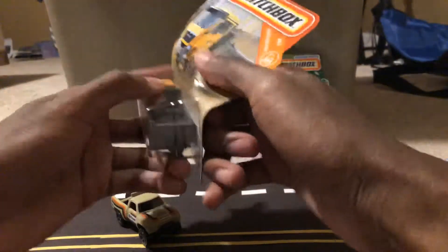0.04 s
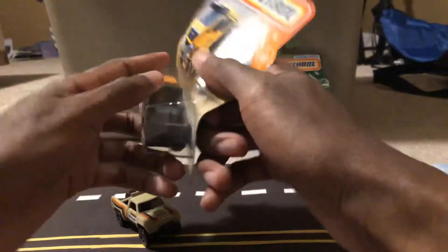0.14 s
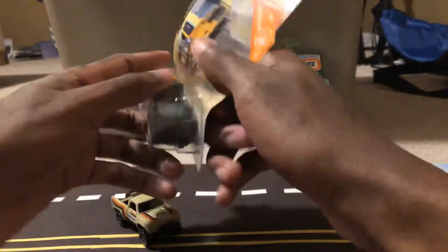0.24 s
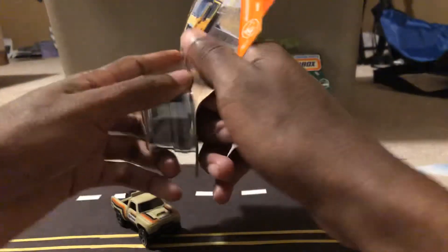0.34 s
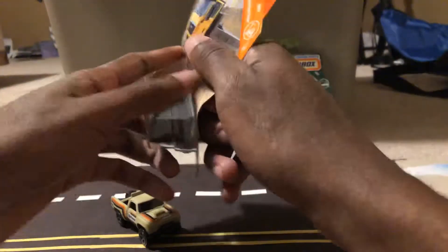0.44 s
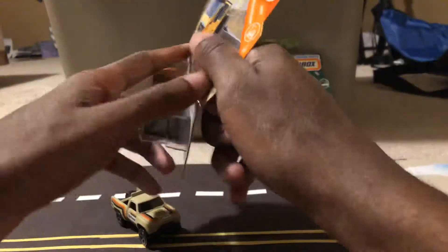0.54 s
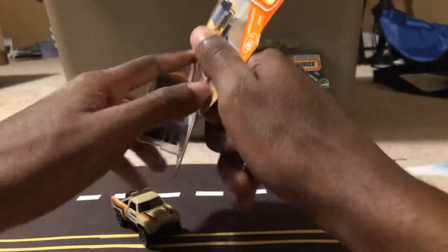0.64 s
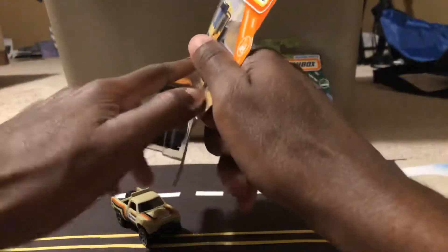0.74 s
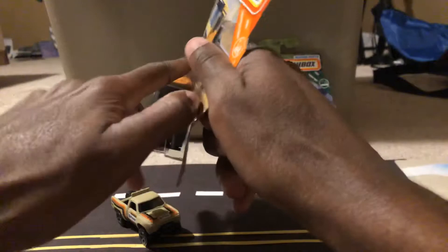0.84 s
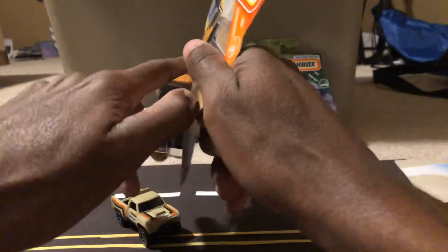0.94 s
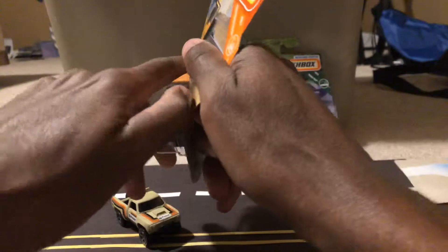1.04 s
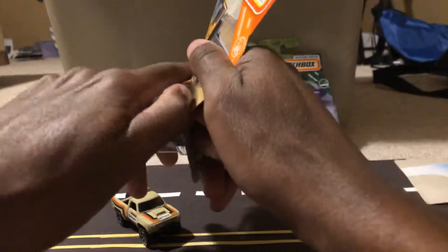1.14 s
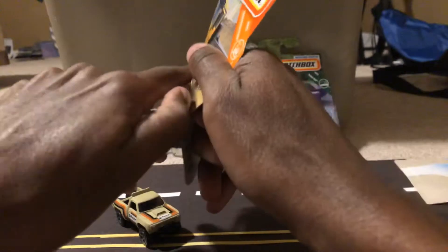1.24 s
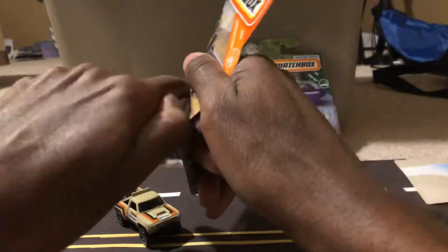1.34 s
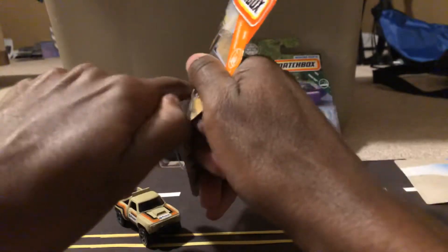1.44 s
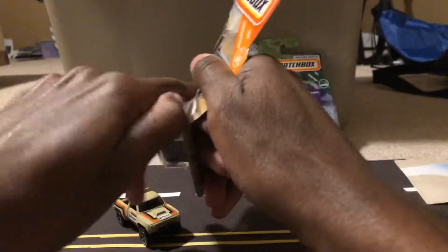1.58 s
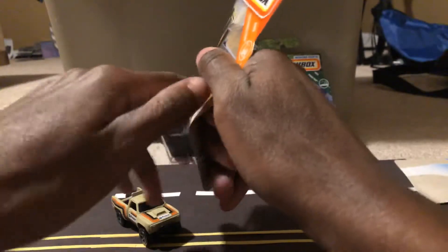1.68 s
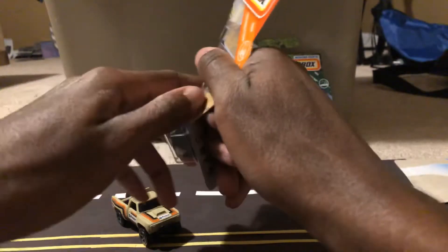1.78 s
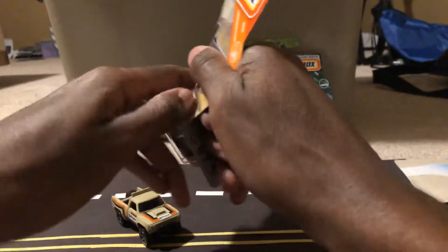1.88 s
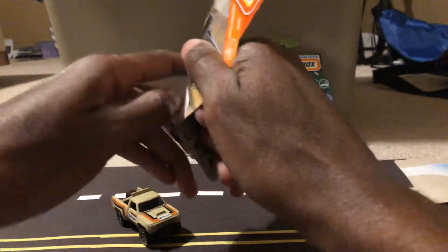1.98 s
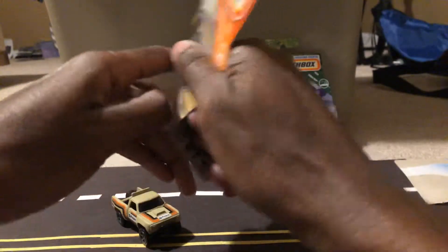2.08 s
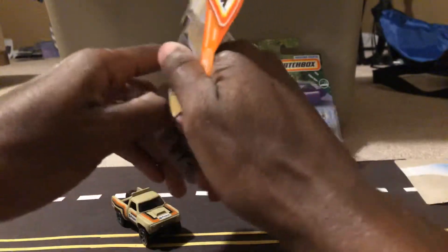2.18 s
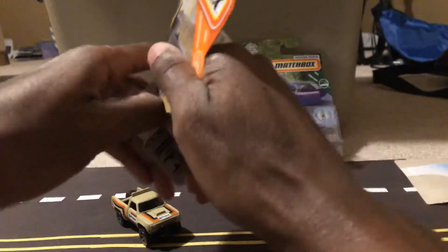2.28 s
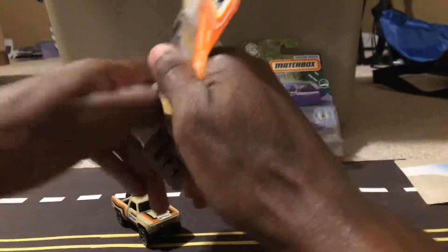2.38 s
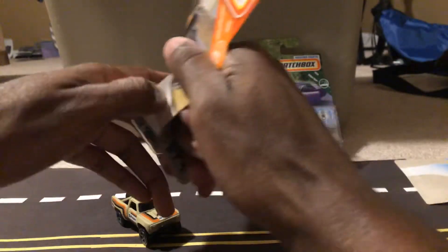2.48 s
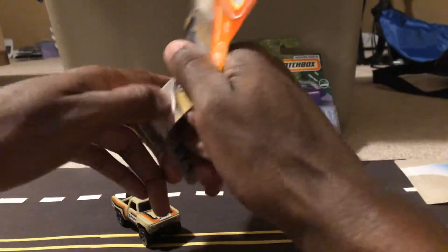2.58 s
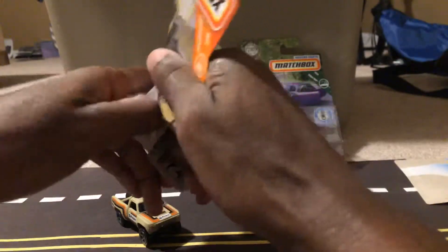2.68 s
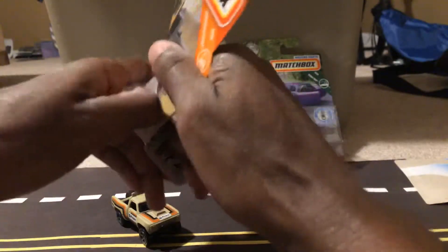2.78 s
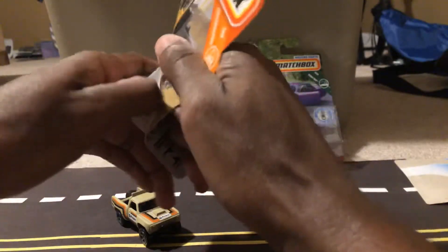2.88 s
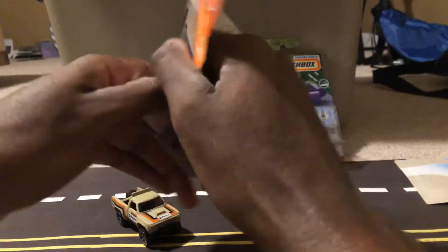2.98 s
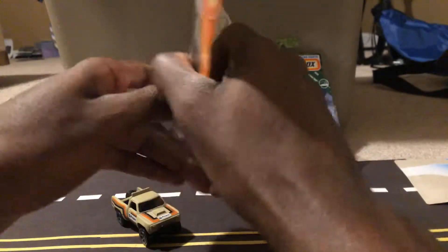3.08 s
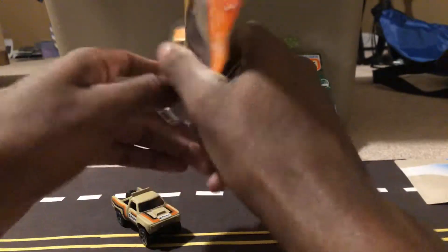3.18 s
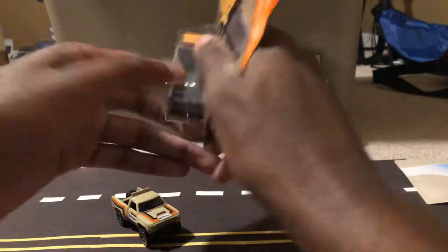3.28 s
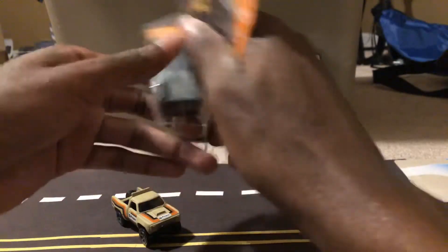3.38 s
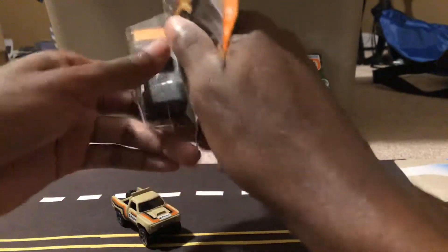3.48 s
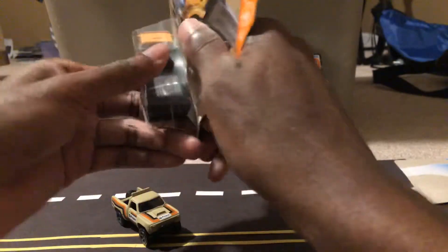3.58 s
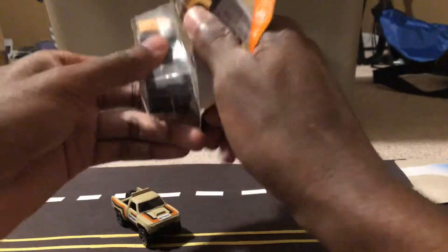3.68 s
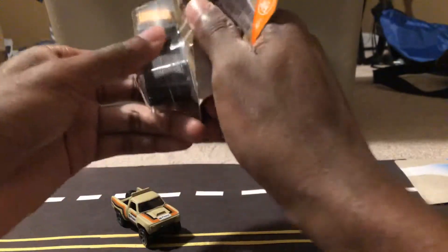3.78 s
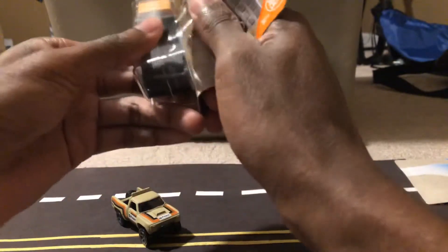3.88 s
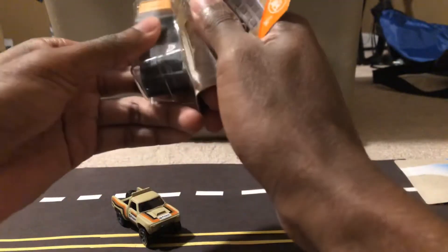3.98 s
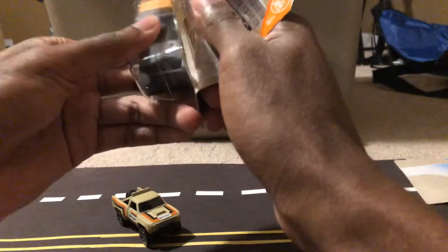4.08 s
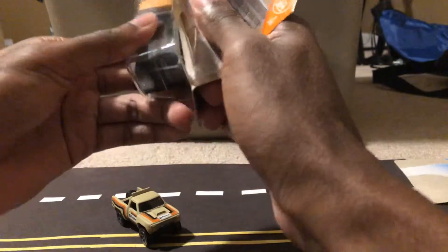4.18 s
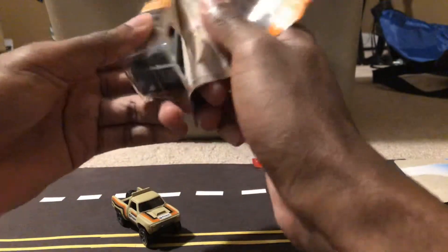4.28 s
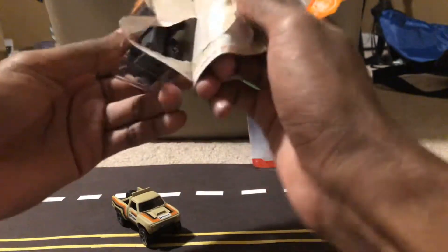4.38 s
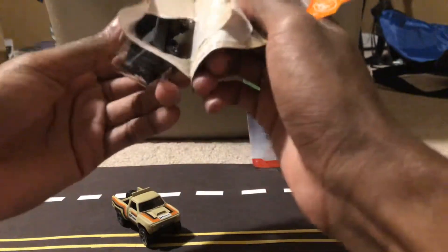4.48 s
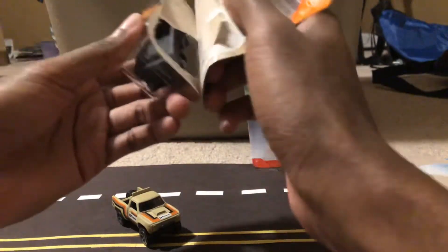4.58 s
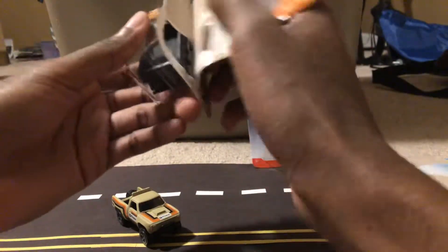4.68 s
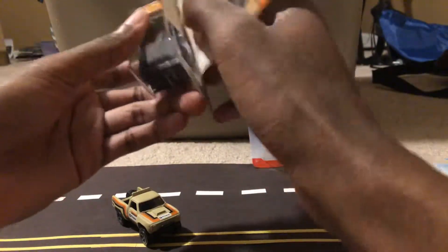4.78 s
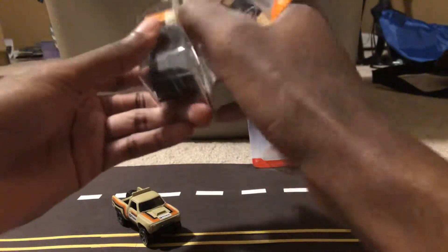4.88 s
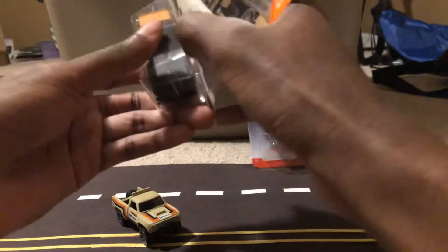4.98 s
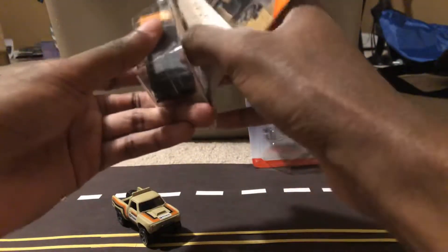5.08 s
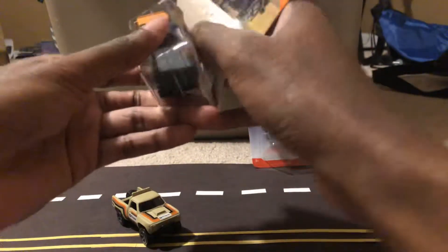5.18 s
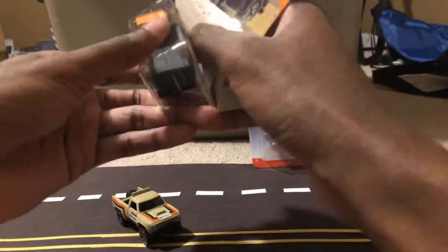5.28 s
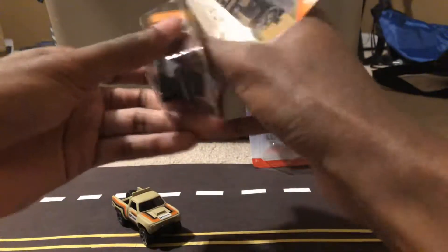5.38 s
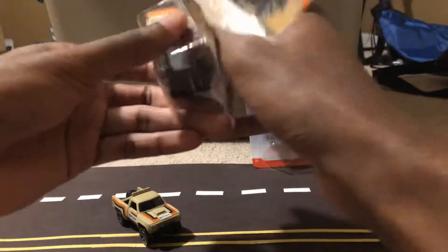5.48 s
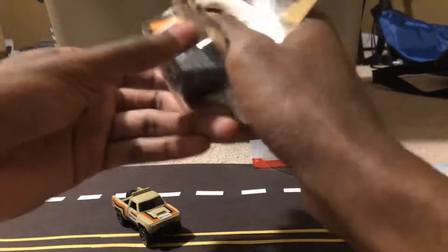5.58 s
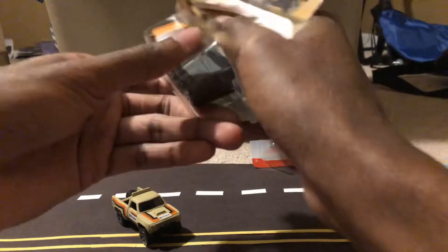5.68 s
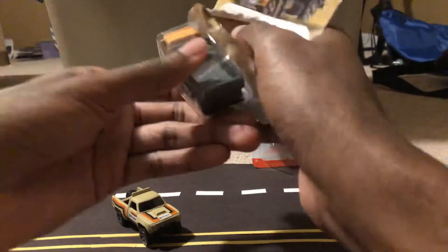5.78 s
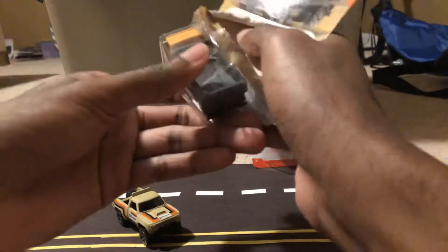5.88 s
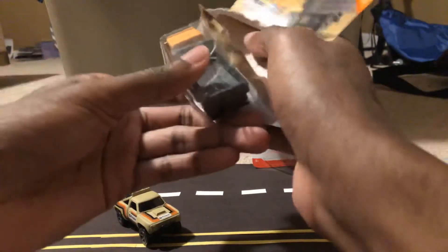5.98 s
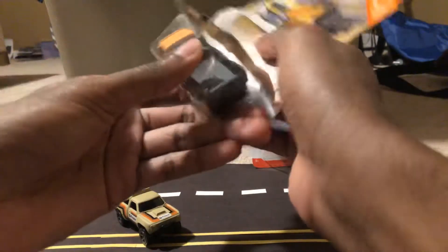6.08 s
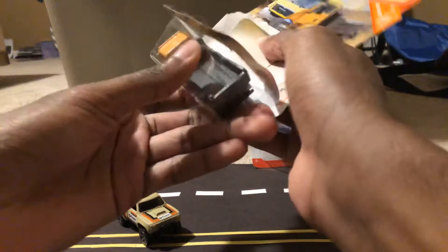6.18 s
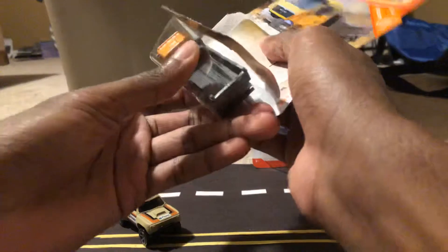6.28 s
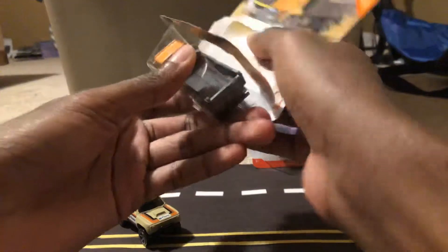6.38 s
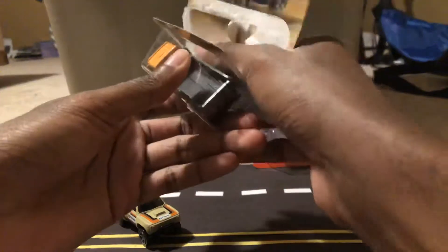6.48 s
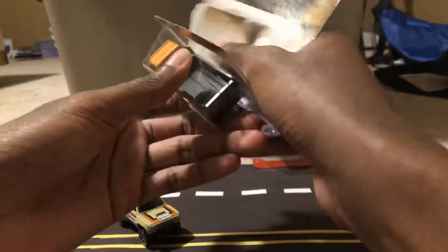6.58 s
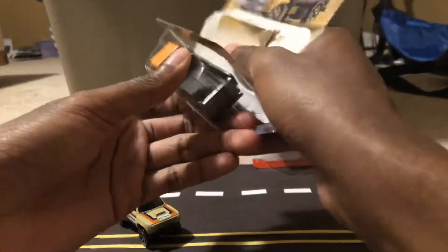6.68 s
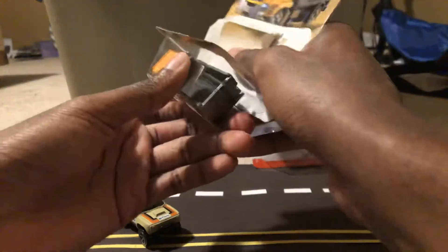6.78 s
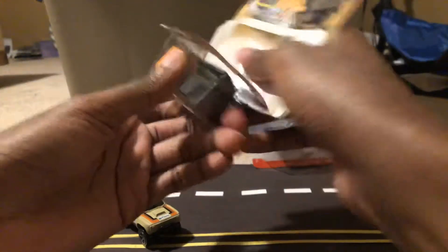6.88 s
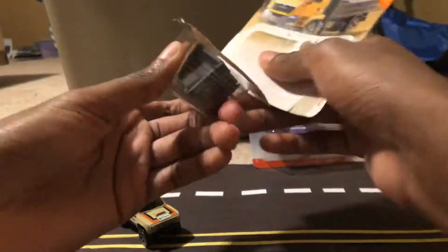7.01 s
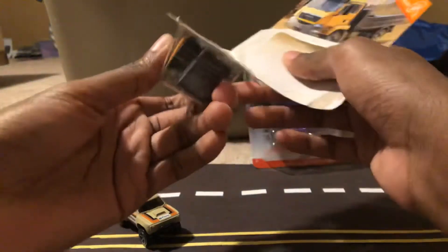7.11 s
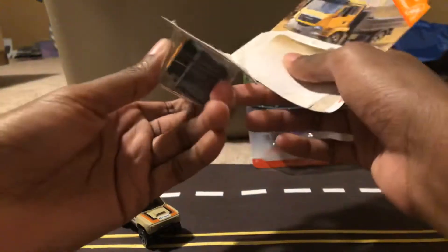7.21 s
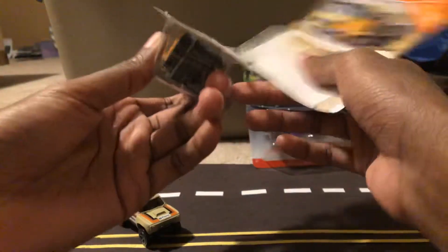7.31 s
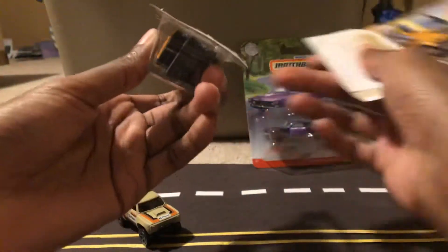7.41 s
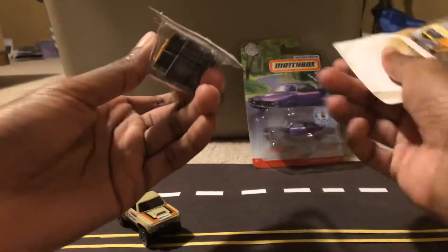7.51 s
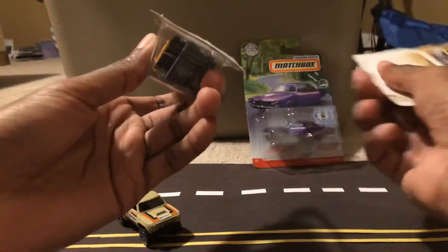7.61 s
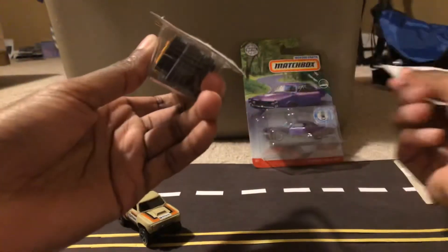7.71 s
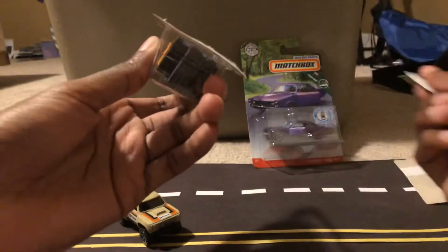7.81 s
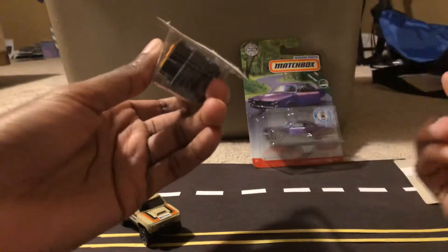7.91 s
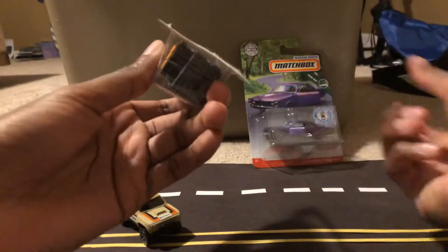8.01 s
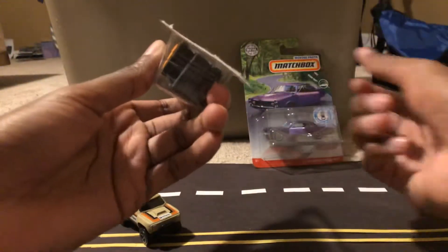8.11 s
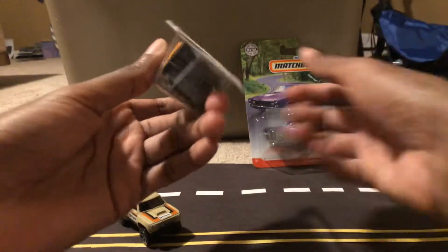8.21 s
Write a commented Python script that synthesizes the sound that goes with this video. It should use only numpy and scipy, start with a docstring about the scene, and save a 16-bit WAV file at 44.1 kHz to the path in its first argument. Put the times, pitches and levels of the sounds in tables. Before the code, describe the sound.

Hands peel card backing off a stiff plastic blister up close, with dry rasping tears, crinkles and sharp ringing snaps in a quiet room.

```python
"""A first short pull rasps over a quiet room's rumble and drone, and a small sharp snap follows at once:
two hands peel the card backing off a stiff plastic blister, close to the microphone.
Filtered noise and clicks swell and fade as card fibres tear and scrape; the blister buckles in ringing snaps,
each setting off a short slide of the sheets. The shell's resonances colour both, and the rim squeaks midway.
Near the end the card is laid aside with a soft bump, a decaying low sine."""
import sys
import numpy as np
from scipy import signal
from scipy.fft import rfft, irfft
from scipy.io import wavfile

SR = 44100
rng = np.random.default_rng(int(sys.argv[2]) if len(sys.argv) > 2 else 0)


def digitize_waveform(pressure):
    """Quantize a signal to 16-bit integers and store it at the path in sys.argv[1].

    Rows of a 2-D input are taken as channels; values are limited to [-1, 1].
    """
    field = np.atleast_2d(pressure).T
    bounded = np.clip(field, -1, 1)
    quanta = np.round(bounded * 32767).astype(np.int16)
    wavfile.write(sys.argv[1], SR, quanta)


N = 363825  # length in samples
TIME = np.arange(N) / SR  # seconds

# steady colour of the room's rumble and hiss, before scaling: f/Hz, relative level/dB
BACKGROUND = [(20, -34), (35, -26), (52, 1), (100, 5), (150, -5), (230, 1), (320, -8), (450, -12.5),
              (1000, -13.5), (2000, -25.5), (5000, -23.5), (7000, -22), (10000, -33.5), (16000, -32)]
BACKGROUND_DB = -67.5  # rms
# low drone in the room: t/s, rms level/dB
DRONE = [(0, -88), (3.2, -74), (3.8, -70), (5.3, -66), (6.3, -70.5), (7.3, -82), (8.25, -83)]
DRONE_HZ = 98.6

# pulls of card over plastic, levels before the gains in rubbing():
# hardest moment t/s, swell/s, fade/s, friction level/dB, brightness/dB per octave, card flexing level/dB
PULLS = [(0.01, 0.099, 0.24, -71, -6, -59), (0.095, .03, 0.13, -63, 1.5, -65),
         (0.3, 0.034, 0.12, -72.5, 0.5, -73), (0.539, 0.14, 0.62, -71, -1, -68.5),
         (1.05, .05, 0.089, -75.5, -2, -86), (1.219, 0.026, 0.043, -61.5, -3, -58),
         (1.445, 0.085, 0.13, -58.5, 2, -60.5), (1.71, .02, .26, -61, 1, -77),
         (2.012, 0.27, 0.1, -62, 2.5, -56.5), (2.169, 0.14, 0.42, -65, 0, -59.5),
         (2.3, 0.34, 0.18, -62.5, 7.5, -76), (2.348, 0.068, 0.13, -55.5, 3.5, -51.5),
         (2.69, 0.13, 0.2, -67.5, 0, -62), (2.85, 0.077, 0.54, -69, 7.5, -65.5),
         (3.079, 0.065, 0.16, -62, -3, -56.5), (3.26, 0.39, 0.16, -67, -0.5, -66),
         (3.41, 0.24, 0.25, -61.5, -1, -63.5), (3.478, 0.04, 0.22, -55, -4, -46),
         (3.85, 0.31, 0.12, -64, 1, -61), (4.079, 0.28, 0.33, -56.5, 1, -60.5),
         (4.319, 0.15, 0.056, -51.5, .5, -52), (4.405, 0.095, 0.12, -40, 2.5, -43),
         (4.69, 0.078, 0.075, -62, -1.5, -74), (4.85, .24, 0.4, -60, -4, -56),
         (5.121, 0.04, 0.36, -64, -2, -59), (5.375, 0.032, 0.044, -59, -3, -53),
         (5.448, 0.057, 0.17, -50.5, -3, -46.5), (5.64, 0.17, 0.23, -49.5, 0.5, -47.5),
         (5.718, 0.032, 0.2, -50.5, -0.5, -51), (6.02, 0.18, 0.24, -51, -1.5, -56),
         (6.15, 0.064, 0.081, -45.5, 0, -56), (6.276, 0.022, 0.025, -78, -2, -56),
         (6.335, .02, .06, -78.5, 10, -80), (6.575, 0.033, 0.055, -54, -2, -52.5),
         (6.7, 0.13, 0.91, -74, -2, -73), (6.956, 0.059, 0.15, -43, 0, -46.5),
         (7.151, 0.08, 0.18, -56, 2, -60.5), (7.235, 0.13, 0.074, -58, -1.5, -58.5),
         (7.402, 0.074, 0.089, -49.5, 0, -46), (7.68, 0.14, 0.65, -75.5, 0, -71.5),
         (7.998, 0.036, 0.042, -69.5, -5, -57.5), (8.09, 0.055, 0.23, -75, -3, -64.5)]
SWING_DB = 26.5  # climb over one swell time, and drop over one fade time
# colour of the scrape and of the flexing card: f/Hz, relative level/dB
FRICTION_COLOUR = [(800, 2.5), (1150, 0.5), (1600, -3.5), (2300, -3), (4500, -0.5), (7500, -6.5),
                   (12500, -9.5), (16000, -12)]
FLEXING_COLOUR = [(60, -5.5), (110, -2), (200, -3), (300, 0.5), (420, -4.5), (700, -6)]
CRINKLES_PER_S, CRINKLE_Q = 150, 14
# resonances of the blister shell: f/Hz, width/Hz, lift/dB
SHELL = [(490, 234, 2.5), (678, 128, 4), (858, 140, -4), (1080, 165, 5), (1240, 60, 5.5), (1640, 240, 11),
         (2520, 134, 6), (3350, 57, 6), (3830, 63, 5.5), (4500, 120, 3)]

# buckling snaps: t/s, shell thud level/dB, wall ring level/dB, wall f/Hz, crack level/dB, crack f/Hz
SNAPS = [(0.067, -62, -54, 645, -39.5, 5520), (0.171, -57.5, -55, 950, -64, 6180),
         (0.357, -45, -47, 1130, -53.5, 2650), (1.206, -51, -50, 563, -53.5, 3870),
         (1.233, -49, -49, 737, -58, 3230), (1.346, -58, -60.5, 630, -77, 3130),
         (1.372, -57, -62, 1010, -88, 3300), (1.409, -53, -50, 990, -68, 5240),
         (1.459, -49, -50.5, 760, -55, 4870), (1.691, -52.5, -41.5, 1920, -33, 4150),
         (2.455, -49, -60, 560, -66, 5490), (2.508, -47.5, -47.5, 1020, -54.5, 2700),
         (2.526, -49.5, -53, 980, -66, 2410), (2.555, -48, -57.5, 644, -61, 3120),
         (2.857, -60, -58.5, 660, -57, 5030), (2.977, -55.5, -53, 700, -52, 3920),
         (3.072, -52, -46, 730, -52, 3170), (3.383, -68, -52, 1240, -46.5, 4300),
         (3.464, -54, -41, 720, -45, 4400), (3.503, -52, -46, 1240, -51, 4580),
         (3.54, -44.5, -52, 730, -52, 2370), (3.593, -47.5, -51, 706, -58, 3500),
         (3.735, -40, -38.5, 1060, -56.5, 2280), (3.958, -61, -55.5, 1640, -41.5, 5000),
         (4.027, -45, -38, 1215, -47.5, 5070), (4.093, -46.5, -75, 440, -52, 2610),
         (4.372, -37.5, -43, 507, -46, 4030), (4.386, -51, -33, 1210, -48, 5330),
         (4.399, -26.5, -34.5, 514, -58, 7390), (4.411, -59, -30, 1090, -50, 5230),
         (4.433, -33.5, -36, 574, -38, 5230), (4.509, -38, -46, 582, -51, 5360),
         (4.538, -42, -46, 490, -53, 4910), (4.845, -51.5, -44.5, 1620, -52, 5170),
         (4.863, -56, -48, 1600, -61, 5100), (5.244, -36, -43.5, 490, -47, 3750),
         (5.297, -68, -49, 1820, -46, 3430), (5.356, -55, -51, 563, -65.5, 3430),
         (5.446, -42, -41, 378, -50.5, 2220), (5.644, -39, -38, 1080, -52, 3740),
         (5.676, -42, -31, 1080, -40.5, 2520), (5.739, -36.5, -40, 580, -46, 2520),
         (5.76, -33, -27.5, 477, -44.5, 2520), (5.912, -46, -34, 1230, -37.5, 2520),
         (5.932, -44, -39.5, 1250, -47, 4140), (5.996, -46, -37, 1550, -47.5, 9200),
         (6.145, -43, -35.5, 1490, -50, 2640), (6.47, -45, -38.5, 1006, -80, 2470),
         (6.49, -64, -51, 1120, -79, 2430), (6.572, -61, -45.5, 1800, -49, 2530),
         (6.666, -55, -48.5, 1596, -65, 4500), (6.945, -50, -38.5, 1570, -37, 3670),
         (6.969, -35.5, -45, 627, -44, 4600), (6.977, -37.5, -37.5, 418, -42, 4660),
         (8.186, -58.5, -70, 650, -64.5, 3430)]
# the slide after a snap: levels for a medium snap, and the share of a harder snap's excess they follow
MEDIUM_SNAP_DB, SLIDE_DB, SLIDE_FLEX_DB, SLIDE_FOLLOWS = -52, -66.5, -62, 0.37
SLIDE_SWELL_S, SLIDE_FADE_S, SLIDE_LAG_S = 0.03, 0.12, 0.0044
# its tilt in dB per octave, and the rise of that tilt per dB by which the crack tops the ring
SLIDE_BRIGHTNESS, BRIGHTNESS_PER_DB = -2, 0.1946
# fizz relative to its crack: value up to a soft crack's level, then its rise per dB of harder crack
SOFT_CRACK_DB, SOFT_FIZZ_DB, FIZZ_PER_DB = -43, -16, 0.92

# soft bumps of hand and card: t/s, level/dB before gain and envelope, f/Hz
BUMPS = [(0.358, -50, 190), (3.5, -43, 150), (4.402, -48, 106), (6.984, -36.5, 141), (8.005, -43.5, 165)]
# squeak of the plastic rim as the glue lets go: t/s, rms level/dB before the room
SQUEAK = [(3.72, -68), (3.79, -67), (3.91, -63), (3.96, -57), (4.01, -63), (4.25, -81), (4.9, -69),
          (5.1, -78)]
SQUEAK_HZ, SQUEAK_WIDTH_HZ = 5240, 220
CUTOFF_HZ = 15900


def from_db(db):
    """Decibels to gain."""
    return 10 ** (np.asarray(db) / 20)


def rms_one(x):
    """Scale to unit rms."""
    return x / np.sqrt(np.mean(x ** 2) + 1e-20)


def in_time(rows):
    """Draw each column of a curve out to every sample."""
    s, *columns = np.transpose(rows)
    return [np.interp(TIME, s, c) for c in columns]


def at_hz(points, hz):
    """Read a spectrum on a log-frequency axis."""
    freq, level = np.transpose(points)
    return np.interp(np.log(hz + 1e-9), np.log(freq), level)


def band(x, low, high, order=2):
    """Causal band-pass."""
    high = min(high, SR / 2 - 1000)
    return signal.sosfilt(signal.butter(order, [low, high], "band", fs=SR, output="sos"), x)


def drift(rate):
    """Random wander of unit rms, heading for a new value `rate` times a second."""
    return rms_one(np.interp(TIME * rate, np.arange(N // 8), rng.standard_normal(N // 8)))


def resonate(x, modes):
    """Each resonance in turn lifts (or dips, if negative) its band; a narrow lift rings on briefly."""
    for hz, width, lift_db in modes:
        peak = signal.lfilter(*signal.iirpeak(hz, hz / width, fs=SR), x)
        x = x + (from_db(lift_db) - 1) * peak
    return x


def add(out, s, sound):
    """Mix a short sound in at time s."""
    start = max(round(s * SR), 0)
    out[start:start + len(sound)] += sound[:max(N - start, 0)]


def background(drone_width_hz=14):
    """Steady rumble and hiss from shaped noise, with a narrow noise drone that swells and fades."""
    hz = np.arange(N // 2 + 1) * SR / N
    spectrum = rfft(rng.standard_normal(N)) * from_db(at_hz(BACKGROUND, hz))
    hush = rms_one(irfft(spectrum, N))
    half_width = drone_width_hz / 2
    drone = rms_one(band(rng.standard_normal(N), DRONE_HZ - half_width, DRONE_HZ + half_width))
    return from_db(BACKGROUND_DB) * hush + from_db(in_time(DRONE)[0]) * drone


def slide_after(s, thud_db, ring_db, wall_hz, crack_db, crack_hz):
    """The short pull that a snap sets free: louder after a hard snap, brighter after a sharp one."""
    friction_db = SLIDE_DB + SLIDE_FOLLOWS * ((ring_db + crack_db) / 2 - MEDIUM_SNAP_DB)
    flex_db = SLIDE_FLEX_DB + SLIDE_FOLLOWS * (thud_db - MEDIUM_SNAP_DB)
    brightness = SLIDE_BRIGHTNESS + BRIGHTNESS_PER_DB * (crack_db - ring_db)
    return s + SLIDE_LAG_S, SLIDE_SWELL_S, SLIDE_FADE_S, friction_db, brightness, flex_db


def effort():
    """Pulls and slides add in power; brightness is their mean, weighted by friction power."""
    t = np.arange(0, N / SR, 0.001)
    friction, flex, lean = 1e-11, 1e-11, 0  # tiny power floors keep the logarithms finite
    slides = [slide_after(*row) for row in SNAPS]
    for s, swell_s, fade_s, friction_db, brightness, flex_db in PULLS + slides:
        shape_db = -SWING_DB * np.maximum((s - t) / swell_s, (t - s) / fade_s)
        power = from_db(friction_db + shape_db) ** 2
        friction = friction + power
        lean = lean + power * brightness
        flex = flex + from_db(flex_db + shape_db) ** 2
    return in_time(np.column_stack([t, 10 * np.log10(friction), lean / friction, 10 * np.log10(flex)]))


def fibres(per_s, spread_db, smooth_db):
    """Fibres let go one by one in clicks of uneven size, over smooth sliding noise."""
    sizes = from_db(spread_db * np.minimum(rng.exponential(1, N), 4)) * rng.choice([-1, 1], N)
    clicks = sizes * (rng.random(N) < per_s / SR)
    return rms_one(rms_one(clicks) + from_db(smooth_db) * rng.standard_normal(N))


def coloured(sources, spectrum, edges, tilt, patchy_db, pivot_hz=3600):
    """Two sources dealt to alternate bands; each band follows the spectrum, leans with the tilt and flickers."""
    out, power = 0, 0
    for k, (low, high) in enumerate(zip(edges, edges[1:])):
        hz = np.sqrt(low * high)
        part = from_db(at_hz(spectrum, hz)) * band(sources[k % 2], low, high, order=3)
        power += np.mean(part ** 2)  # levelled before tilt and flicker
        out = out + part * from_db(tilt * np.log2(hz / pivot_hz) + patchy_db * drift(45))
    return out / np.sqrt(power)


def crinkles(per_s, spread_db, ring_q, tick_share, count=48):
    """Tiny creases pop at random: a dry tick and a ring at one of `count` pitches."""
    pops = (rng.random(N) < per_s / SR) * from_db(-spread_db * rng.random(N))
    dealt = rng.integers(0, count, N)
    rings = 0
    for k, hz in enumerate(np.geomspace(900, 6000, count)):
        struck = pops * (dealt == k) + 1e-18  # the offset keeps the filter out of denormals
        rings = rings + signal.lfilter(*signal.iirpeak(hz, ring_q, fs=SR), struck) / np.sqrt(hz)
    return rms_one(rings) + tick_share * rms_one(band(pops, 2500, 13000, order=1))


def moving_paths(x, shape, moves_per_s):
    """Random echo paths under one envelope, crossfading to a new set at a steady rate."""
    out, step = np.zeros(N), int(SR / moves_per_s)
    fade = np.sqrt(np.hanning(2 * step))
    for start in range(0, N, step):
        paths = rng.standard_normal(len(shape)) * shape
        piece = x[start:start + 2 * step] * fade[:N - start]
        add(out, start / SR, signal.fftconvolve(piece, paths))
    return out


def between_hands(x, scatter_db=-1.5, path_s=0.0041, moves_per_s=12.0):
    """Palms and folds scatter the treble over short paths, which keep changing with the grip."""
    t = np.arange(SR // 200) / SR
    shape = t * np.exp(-np.pi * t / path_s)
    treble = band(x, 1830, 19000, order=1)
    return x + from_db(scatter_db) * moving_paths(treble, shape / np.linalg.norm(shape), moves_per_s)


def ticks(friction_db, per_s=18.0, peak_db=-37.5, spread_db=16.5, follows=0.86, medium_db=-65, low_hz=6500):
    """Now and then a single fibre or thin edge gives a dry, high tick, stronger while the hands pull."""
    level_db = peak_db - spread_db * rng.random(N) + follows * (friction_db - medium_db)
    pops = (rng.random(N) < per_s / SR) * from_db(level_db)
    return between_hands(band(pops, low_hz, 15000, order=1))


def rubbing(friction_gain_db=2.5, flex_gain_db=-3.5, crinkle_db=-6.0, catch_db=1.94, chatter_db=1.5,
            lumpy_db=2.0):
    """Card drags and tears along the plastic, catching and slipping; its bending adds a low, lumpy rustle."""
    friction_db, brightness, flex_db = effort()
    stick_slip = from_db(catch_db * drift(110) + chatter_db * drift(420))
    tearing = [resonate(fibres(per_s=1800, spread_db=3.0, smooth_db=5.0), SHELL) for _ in range(2)]
    bending = [resonate(fibres(per_s=600, spread_db=2.0, smooth_db=4.5), SHELL) for _ in range(2)]
    scrape = coloured(tearing, FRICTION_COLOUR, np.geomspace(780, 16500, 12), brightness, patchy_db=2.0)
    creases = crinkles(per_s=CRINKLES_PER_S, spread_db=1.0, ring_q=CRINKLE_Q, tick_share=0.19)
    scrape = between_hands(scrape + from_db(crinkle_db) * creases)
    rustle = coloured(bending, FLEXING_COLOUR, np.geomspace(55, 780, 7), 0, patchy_db=4.0)
    scrape = scrape * from_db(friction_db + friction_gain_db)
    rustle = rustle * from_db(flex_db + flex_gain_db + lumpy_db * drift(50))
    return stick_slip * (scrape + rustle) + ticks(friction_db)


def snap(thud_db, ring_db, wall_hz, crack_db, crack_hz, rise_s=0.0013, fall_s=0.0036, jump=4.8,
         crack_rise_s=0.00089, crack_fall_s=0.0034, uneven_db=2.0, wall_q=9.9, wall_db=19.0,
         crease_q=21.0, crease_db=15.5, span_s=0.0063):
    """A wall flips over: one jump amid a few milliseconds of tiny slips, ringing in the wall and the shell."""
    t = np.arange(SR // 20) / SR - 0.007  # the build-up runs before zero
    slips = rms_one(rng.standard_normal(len(t)) * from_db(uneven_db * rng.standard_normal(len(t))))
    push = slips * np.exp(np.minimum(t / rise_s, -t / fall_s))
    push[np.searchsorted(t, 0)] += jump
    # the flipping wall gets the strongest resonance, on top of those of the shell
    shell = resonate(push, SHELL + [(wall_hz, wall_hz / wall_q, wall_db)])
    # the crease itself is small and stiff, so it starts abruptly and rings high
    crack = slips * np.exp(np.minimum(t / crack_rise_s, -t / crack_fall_s))
    crease = resonate(crack, [(crack_hz, crack_hz / crease_q, crease_db)])
    fizz_db = SOFT_FIZZ_DB + FIZZ_PER_DB * max(crack_db - SOFT_CRACK_DB, 0)
    crack_low_hz = np.clip(0.7 * crack_hz, 2200, 4500)
    parts = [(band(shell, 210, 778, order=3), thud_db),
             (band(shell, 834, 2140, order=4), ring_db),
             (band(crease, crack_low_hz, 8400, order=3), crack_db),
             (band(crease, 6700, 14600, order=3), crack_db + fizz_db)]
    # each level stands for the part's whole energy averaged over the span
    return sum(x * from_db(db) * np.sqrt(span_s * SR / np.sum(x ** 2)) for x, db in parts)


def snaps(lead_s=0.0068):
    """The blister's walls buckle one after another, each build-up starting just ahead of its time."""
    out = np.zeros(N)
    for s, *blow in SNAPS:
        add(out, s - lead_s, snap(*blow))
    return out


def bumps(rise_s=0.0016, fall_s=0.0051, level_db=3.0):
    """A soft push sets off a low sine that dies away within a few cycles."""
    out, t = np.zeros(N), np.arange(SR // 8) / SR
    envelope = (1 - np.exp(-t / rise_s)) * np.exp(-t / fall_s)
    for s, bump_db, hz in BUMPS:
        add(out, s, from_db(bump_db + level_db) * np.sin(2 * np.pi * hz * t) * envelope)
    return band(out, 56, 900)


def squeak():
    """Quick uneven slips keep one high resonance of the rim singing as the glue lets go."""
    slips = fibres(per_s=360, spread_db=4.0, smooth_db=-12.0)
    half_width = SQUEAK_WIDTH_HZ / 2
    singing = band(slips, SQUEAK_HZ - half_width, SQUEAK_HZ + half_width, order=1)
    peeling = (TIME > SQUEAK[0][0]) & (TIME < SQUEAK[-1][0])
    return peeling * from_db(in_time(SQUEAK)[0]) * rms_one(singing)


def room(x, early_db=-12.5, early_t60=0.19, late_db=-16.0, late_t60=0.52, gap_s=0.009, wall_hz=8500,
         moves_per_s=5.0):
    """A quick scatter from the furniture and a faint longer tail; both shift as the pack is moved about."""
    t, power = np.arange(SR // 2) / SR, 0
    for level_db, t60 in [(early_db, early_t60), (late_db, late_t60)]:
        tail = np.exp(-np.log(1000) * t / t60) * (t > gap_s)
        power = power + (from_db(level_db) * tail / np.linalg.norm(tail)) ** 2
    return moving_paths(band(x, 233, wall_hz, order=1), np.sqrt(power), moves_per_s)


def scene(rub_room_db=-0.5):
    """The blister's walls radiate snaps into the room; the rubbing, sheltered by the hands, sends a bit less."""
    friction = rubbing() + squeak()
    blows = snaps() + bumps()
    around = room(blows + from_db(rub_room_db) * friction)
    return (background() + friction + blows + around)[None]


def record(dry):
    """A steep low-pass cuts the top."""
    return signal.sosfilt(signal.ellip(12, 0.1, 80, CUTOFF_HZ, fs=SR, output="sos"), dry)


dry = scene()
out = record(dry)
digitize_waveform(out)
```